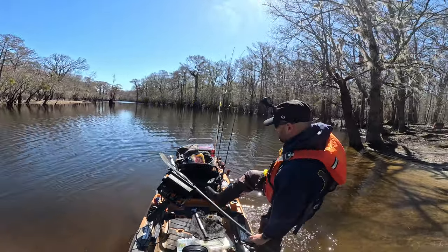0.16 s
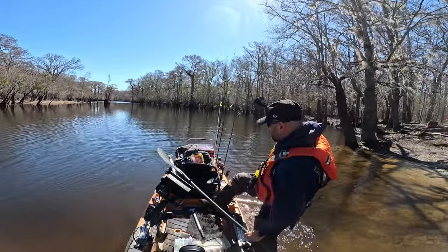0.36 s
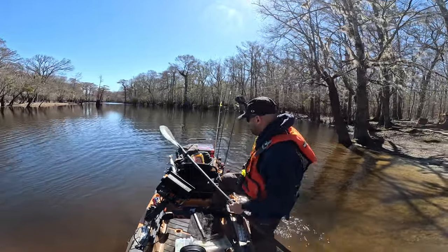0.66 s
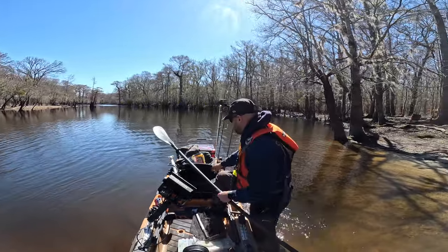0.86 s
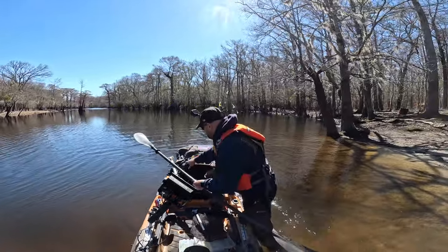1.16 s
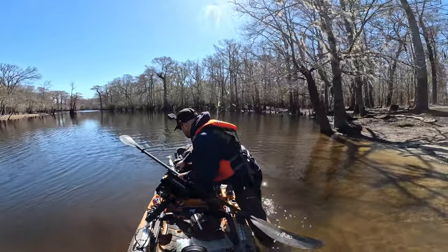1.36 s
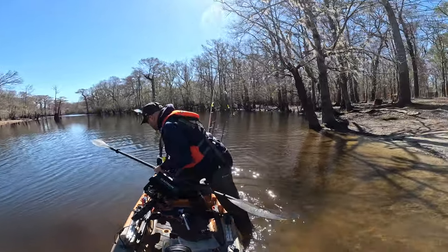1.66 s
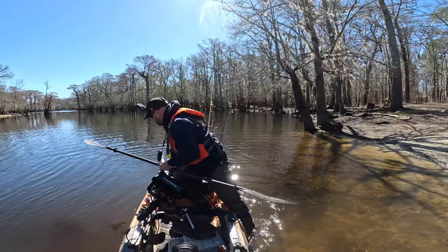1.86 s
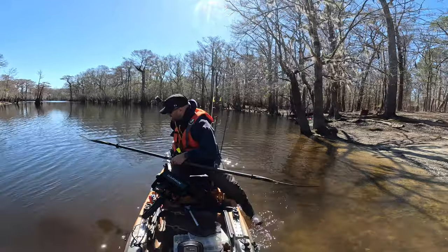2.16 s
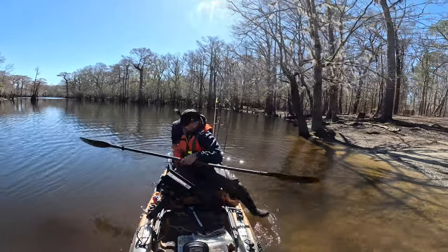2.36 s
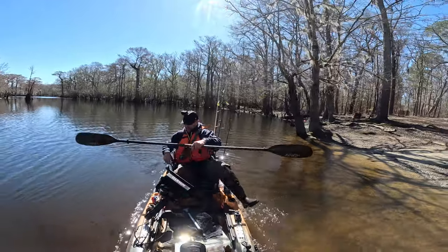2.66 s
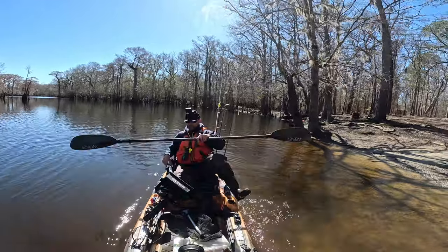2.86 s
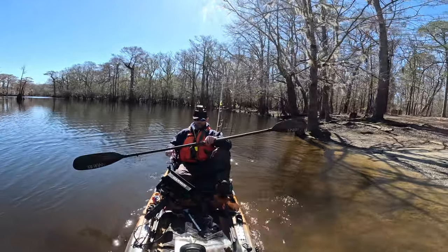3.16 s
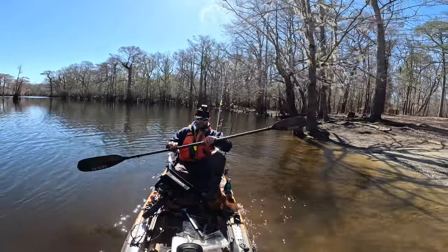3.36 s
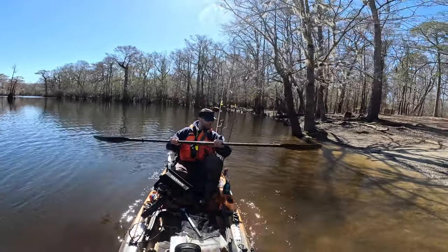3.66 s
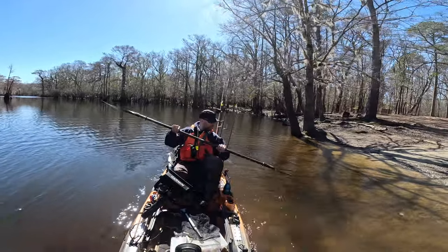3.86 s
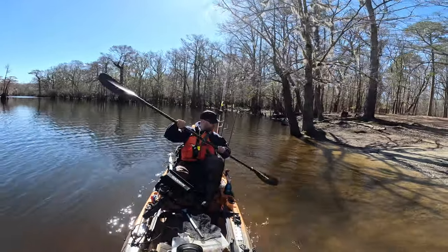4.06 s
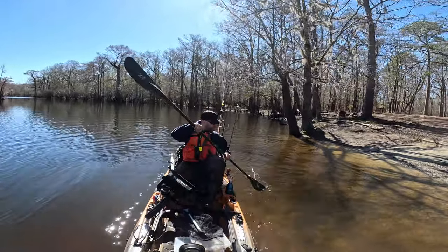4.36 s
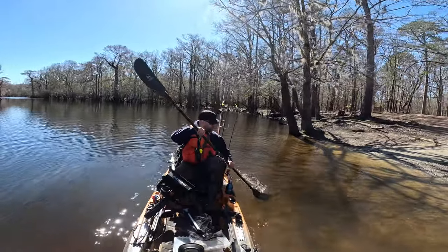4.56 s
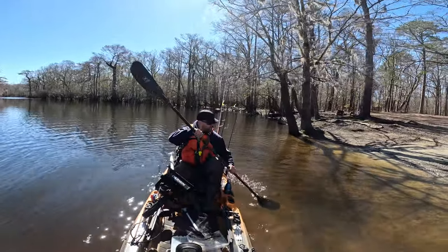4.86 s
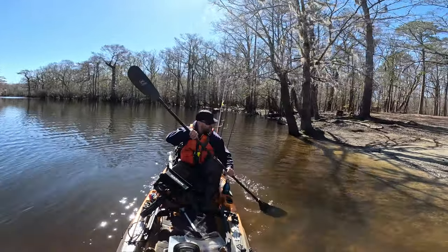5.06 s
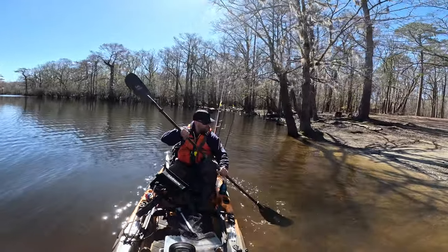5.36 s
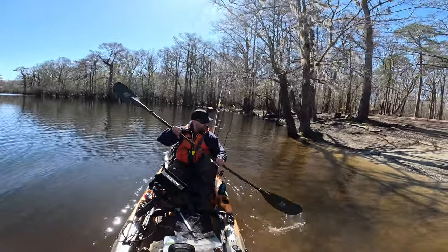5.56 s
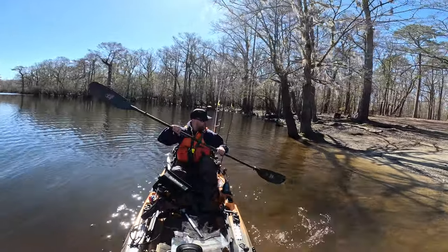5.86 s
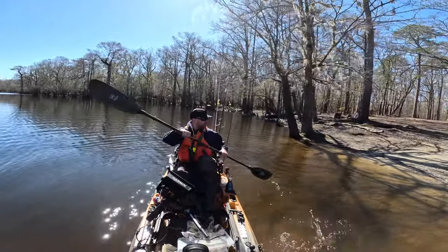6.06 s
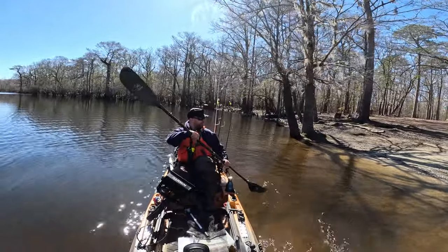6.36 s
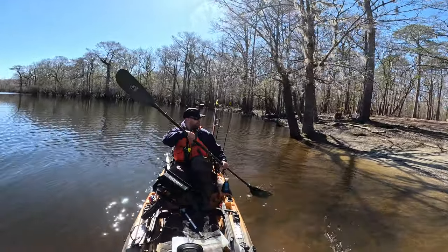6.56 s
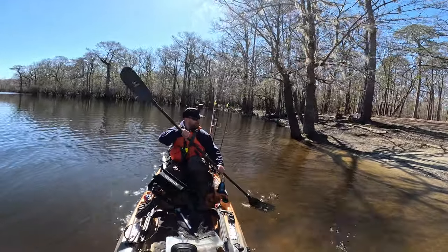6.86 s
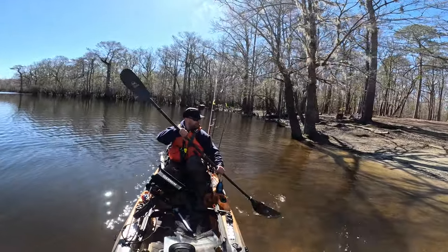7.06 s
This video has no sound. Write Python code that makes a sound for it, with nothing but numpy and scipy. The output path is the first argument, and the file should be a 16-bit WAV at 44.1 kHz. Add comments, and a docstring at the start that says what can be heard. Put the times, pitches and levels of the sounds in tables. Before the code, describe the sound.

Gritty hull scrapes and boomy knocks, wet splashing and a bubbly scramble aboard, then calm paddle strokes churn river water in a light breeze.

```python
"""A loaded plastic kayak is shoved off a sandy bank: short gritty scrapes and ticks, swinging-panel thumps,
falling slaps and a boomy rumble, all ringing through the hollow hull, heard from its deck.
Hard gear clacks as short decaying partials, and waterproof clothes swish as swells of filtered noise.
Legs and two slow paddle strokes churn water made of random clicks and swarms of ringing bubbles.
Behind them, low noise buffets the microphone in a light breeze and broader noise is the river's wash."""
import sys
import numpy as np
from scipy import signal
from scipy.fft import rfft, irfft
from scipy.io import wavfile
from scipy.ndimage import uniform_filter1d

SR = 44100
rng = np.random.default_rng(int(sys.argv[2]) if len(sys.argv) > 2 else 0)


def dump_mix(stems):
    """Bounce the given channels to the path in sys.argv[1] as a 16-bit WAV at rate SR."""
    frames = np.atleast_2d(stems).T  # one column per channel
    limited = np.clip(frames, -1, 1)  # hard clip at full scale
    pcm = np.round(limited * 32767).astype(np.int16)
    wavfile.write(sys.argv[1], SR, pcm)


N = 317520
T = np.arange(N) / SR
HZ = np.fft.rfftfreq(N, 1 / SR)

# How hard the hull slides and rocks, from the shove through boarding to the free glide.
# Each row: time in seconds, relative level in dB.
SLIDING = [(0, -41), (.3, -28), (.55, -35.5), (.85, -41), (1.6, -40), (1.9, -39), (2.03, -33), (2.6, -34.5),
           (3.0, -42.5), (3.3, -43.5), (3.9, -45), (4.25, -48.5), (5.15, -45), (5.5, -54), (5.95, -47),
           (6.4, -55.5), (7.2, -60)]
# Spectrum of swishing cloth and fine spray. Each row: frequency in Hz, relative level in dB.
SWISH_SPECTRUM = [(800, -43), (2000, -5), (3200, 5.5), (4000, 2), (6200, -4), (7400, -9.5), (8600, -26.5),
                  (11000, -10.5), (13000, -21), (15000, -44)]


def amp(db):
    """Decibels to gain."""
    return 10 ** (np.asarray(db) / 20)


def evened(x):
    """Scales to an rms of one."""
    return x / np.sqrt(np.mean(x ** 2) + 1e-20)


def peaked(x):
    """Scales so that the loudest 4 ms have an rms of one."""
    power = uniform_filter1d(x ** 2, size=176, mode="constant")
    return x / np.sqrt(power.max() + 1e-20)


def read(points, hz):
    """Reads a spectrum in dB, interpolated on a log-frequency axis."""
    f, value = np.transpose(points)
    return np.interp(np.log(hz + 1), np.log(f + 1), value)


def level(rows):
    """Gain over time from rows of (seconds, dB)."""
    return amp(np.interp(T, *np.transpose(rows)))


def swells(rows):
    """Gain over time of overlapping movements, each growing to its height and dying away."""
    swell_db = 20.5  # growth over the rise, and loss over the fall
    power = 0
    for s, rise, fall, db in rows:
        distance = np.maximum((s - T) / rise, (T - s) / fall).clip(0, 10)
        power = power + amp(db - swell_db * distance) ** 2
    return np.sqrt(power)


def add(mix, s, sound):
    """Lays a sound into the mix at s seconds."""
    part = mix[max(round(s * SR), 0):][:len(sound)]
    part += sound[:len(part)]


def play(rows, source):
    """Plays every row of an event table with one source."""
    out = np.zeros(N)
    for s, db, *rest in rows:
        add(out, s, amp(db) * source(*rest))
    return out


def noise(points):
    """Steady noise of a given spectrum."""
    return evened(irfft(rfft(rng.standard_normal(N)) * amp(read(points, HZ)), N))


def drift(rate_hz):
    """Slow random wandering: noise kept mostly below rate_hz."""
    return evened(irfft(rfft(rng.standard_normal(N)) / (1 + (HZ / rate_hz) ** 4), N))


def colour(x, points, tilt_db, size=2048):
    """A causal minimum-phase filter, so that attacks stay sharp; the tilt acts per octave above 1 kHz."""
    hz = abs(np.fft.fftfreq(size, 1 / SR))
    log_gain = np.log(amp(read(points, hz) + tilt_db * np.log2(np.maximum(hz / 1000, 1))))
    taps = np.fft.ifft(np.exp(np.conj(signal.hilbert(log_gain)))).real
    return signal.fftconvolve(x, taps[:size // 2])[:len(x)]


def scatter(t60, size=8192):
    """A short diffuse tail of unit energy, decaying 60 dB in t60 seconds."""
    t = np.arange(size) / SR
    tail = rng.standard_normal(size) * amp(-60 * t / t60) * (1 - np.exp(-t / 0.00062))
    return tail / np.linalg.norm(tail)


def clicks(per_s, spread_db, size):
    """Random clicks of either sign, a few of them large."""
    sizes = amp(spread_db * np.minimum(rng.exponential(1, size), 3))
    return (rng.random(size) < per_s / SR) * rng.choice([-1, 1], size) * sizes


def air():
    """Low buffeting at the microphone, from breeze, puffs and the rocking deck, over the river's wash."""
    # Spectra of the buffeting and of the river. Each row: frequency in Hz, relative level in dB.
    wind_spectrum = [(8, -20), (25, 0), (50, -5), (80, -5), (130, -16.5), (300, -28), (1000, -86)]
    river_spectrum = [(40, -27), (200, 1), (500, 0), (1000, -2), (2000, -8.5), (3100, -15.5), (4200, -27),
                      (6500, -34.5), (8500, -43), (12000, -49), (15000, -47)]
    # Puffs of breeze. Each row: time of the height, rise and fall in seconds, level in dB.
    puffs = [(0.65, 0.27, .25, -30.5), (2.03, 0.11, .4, -29), (2.45, 0.46, 0.27, -23.5),
             (2.69, 0.4, 0.29, -26.5), (3.84, 0.11, 0.36, -34.5), (5.2, 0.86, 0.6, -39.5),
             (5.95, 0.74, .2, -43), (7.12, 0.36, 0.13, -41.5)]
    # Wash of the open river. Each row: time in seconds, relative level in dB.
    wash = [(0, -42.5), (.9, -47.5), (1.7, -46.5), (3.1, -45), (4.2, -48.5), (5.3, -46), (7.2, -51)]
    breeze_db, gusty_db, rocking_db = -50, 5.5, -6.5  # rocking is relative to the sliding curve
    breeze = np.hypot(amp(breeze_db + gusty_db * drift(5.3)), swells(puffs))
    buffeting = np.hypot(breeze, amp(rocking_db) * level(SLIDING))
    river = noise(river_spectrum) * amp(0.5 * drift(30))
    return noise(wind_spectrum) * buffeting + amp(-3.0) * river * level(wash)


def bubble(hz, length, rise):
    """A pocket of air rings, its pitch gliding by rise octaves per length as it nears the surface."""
    u = np.arange(int(2 * length * SR) + 8) / (length * SR)
    turns = np.cumsum(hz * 2 ** (rise * u)) / SR
    envelope = (1 - np.exp(-u / 0.064)) ** 2 * np.exp(-4.5 * u)
    return peaked(np.sin(2 * np.pi * turns) * envelope)


def bubbles(low_hz, high_hz, per_s, cycles, spread_db, tilt_db, count=36):
    """A swarm of bubbles of many sizes, some louder; smaller bubbles ring higher and shorter."""
    out = np.zeros(N)
    for hz in np.geomspace(low_hz, high_hz, count):
        life, rise = rng.uniform(.5, 1.5), rng.uniform(-.1, .5)
        strengths = amp(spread_db * np.minimum(rng.exponential(1, N), 3))
        births = (rng.random(N) < per_s / count / SR) * strengths
        ring = bubble(hz, life * cycles / hz, rise)
        swarm = signal.oaconvolve(births, ring / np.linalg.norm(ring))[:N]
        out += amp(tilt_db * np.log2(hz / low_hz)) * swarm
    return evened(out)


def plop(hz, rise, splat=0.46):
    """Water closes over a large bubble with a wet splat around its pitch."""
    length = .028 * (hz / 1000) ** -0.72  # seconds; lower bubbles ring longer
    ring = bubble(hz, length, rise)
    u = np.arange(len(ring)) / (length * SR)
    spectrum = [(hz / 5, -25), (hz * 0.3, -2), (hz * 1.43, 0), (hz * 3, -16), (hz * 12, -48)]
    wet = colour(rng.standard_normal(len(ring)), spectrum, 0)
    return peaked(ring + splat * peaked(wet * np.exp(-3.5 * u)))


def water():
    """Legs and blades tear the surface and stir up gurgles, small bubbles, fine droplets and spray."""
    # A leg or blade moving through water. Each row: time of the height, rise and fall in seconds,
    # relative splash level in dB, deep gurgle over splash in dB, fine droplets over splash in dB.
    sloshes = [(0.50, .9, 0.23, -44, -9, -13), (1.56, 0.5, 0.45, -49, -16, -17.5),
               (2.16, 0.23, 0.71, -46, 5, -16), (2.40, 0.12, 0.3, -38, -3.5, -12.5),
               (2.80, 0.57, 1, -51.5, -13, -9), (4.70, 0.18, 0.29, -48.5, -4, -7),
               (4.82, 0.16, 0.34, -50, -6, -13.5), (5.40, 0.31, 0.73, -58.5, 15, -25),
               (5.62, 0.35, 0.47, -49.5, 0.5, -18), (5.79, 0.22, 0.38, -47, -7, -12.5),
               (6.20, 0.21, 0.26, -52.5, 2, -18), (6.76, 0.82, 0.47, -53, -1, -15.5),
               (7.04, 0.21, 0.21, -54, 7.5, -20), (7.17, 0.2, 0.24, -48.5, -0.5, -15)]
    # Largest single bubbles. Each row: start in seconds, relative level in dB, pitch in Hz,
    # rise in octaves over the bubble's life.
    plops = [(0.709, -35.5, 1000, -0.012), (2.071, -33, 970, -0.2), (2.146, -32, 760, -0.3),
             (2.172, -37, 588, .1), (2.352, -35, 760, 0.26), (2.303, -32.5, 1310, -0.27),
             (2.424, -34, 974, 0.27), (2.660, -33.5, 1245, 0.28), (2.678, -33, 1030, -.1),
             (2.750, -30.5, 1470, -0.34), (2.777, -32.5, 1820, -0.14), (4.673, -38, 2110, .2),
             (4.697, -45, 3800, 0.63), (4.746, -44, 1480, -.1), (4.782, -38, 1870, -.2),
             (4.808, -42, 2140, 0.39), (4.889, -43, 1800, 0.49), (5.296, -34.5, 666, 0.43),
             (5.342, -31, 713, 1), (5.350, -30, 1053, 0.57), (5.398, -41, 1060, -.1),
             (5.452, -38, 1026, .2), (5.492, -39.5, 1840, 1), (5.508, -39.5, 735, -0.38),
             (5.556, -36.5, 455, 0.15), (5.690, -36, 1380, 1), (5.720, -38.5, 342, -0.13),
             (5.784, -37.5, 446, -0.0041), (5.797, -43, 3220, .25), (5.865, -40, 900, 0.25),
             (6.739, -31, 1185, -0.29), (6.743, -36.5, 315, -0.73), (6.750, -36.5, 1780, .1),
             (6.773, -36.5, 1055, -0.73), (6.803, -41, 1240, -0.16), (6.863, -40.5, 1430, 0.7)]
    # Spectrum of torn water. Each row: frequency in Hz, relative level in dB.
    churn_spectrum = [(300, -8), (700, 5), (1400, 7), (2800, 9.5), (4000, -6), (6000, -36), (8500, -15),
                      (12000, -22), (15000, -48)]
    spray_db, drips_db = -16.5, -8.5  # gains under the splash's movement

    agitation = swells([(s, rise, fall, db) for s, rise, fall, db, _, _ in sloshes])
    undertow = swells([(s, rise, fall, db + deep_db) for s, rise, fall, db, deep_db, _ in sloshes])
    thrown = swells([(s, rise, fall, db + fine_db) for s, rise, fall, db, _, fine_db in sloshes])

    torn = colour(clicks(per_s=2600, spread_db=3, size=N), churn_spectrum, 0)
    churn = evened(torn) * amp(2.5 * drift(35))
    fizz = bubbles(1200, 3700, per_s=380, cycles=24, spread_db=4, tilt_db=-4)
    droplets = bubbles(3700, 11500, per_s=700, cycles=22, spread_db=4, tilt_db=-13)
    drips = bubbles(1100, 4200, per_s=70, cycles=30, spread_db=2, tilt_db=-4)
    splash = (.36 * churn + .9 * fizz) * agitation + droplets * thrown
    gurgle = bubbles(340, 1300, per_s=260, cycles=22, spread_db=2.2, tilt_db=-1) * undertow
    spray = noise(SWISH_SPECTRUM) * amp(1.3 * drift(25))
    fine = (amp(spray_db) * spray + amp(drips_db) * drips) * agitation
    return amp(-2.5) * splash + amp(-0.05) * gurgle + fine + amp(-2.5) * play(plops, plop)


def clothes():
    """Waterproof cloth swishes as the paddler moves: fluttering noise under slow swells."""
    # Climbing in and sitting down. Each row: time of the height, rise and fall in seconds,
    # relative level in dB.
    rustles = [(1.35, 0.71, 0.44, -58), (2.45, .6, 0.85, -49.5), (3.25, .3, 1.65, -64)]
    swish = noise(SWISH_SPECTRUM) * amp(1.8 * drift(25))
    return amp(-2.5) * swish * swells(rustles)


def clack(scale, tilt_db, bounce_s=0.001078, bounce=0.41, size=4096):
    """Hard plastic meets the shaft, chatters once and rings briefly; higher-pitched parts die sooner."""
    # Partials of the gear at scale one. Each row: pitch in Hz, relative level in dB,
    # 60 dB decay in seconds.
    partials = [(1123, 14.5, 0.065), (1338, 26, 0.029), (2440, 19.5, 0.0079), (2750, 13, 0.0075),
                (3210, 6, 0.019), (5110, 13, 0.0017), (6800, -22.5, 0.013), (7250, -41, 0.006)]
    t = np.arange(size) / SR
    ring = np.zeros(size)
    for hz, db, t60 in partials:
        brightness_db = tilt_db * np.log2(hz / partials[0][0])
        decay_db = -60 * t * scale ** 2 / t60
        ring += amp(db + brightness_db + decay_db) * np.sin(2 * np.pi * hz * scale * t)
    ring *= 1 - np.exp(-t / 0.00054)
    return peaked(ring + bounce * np.interp(t - bounce_s, t, ring, left=0))


def gear(ring_db=-14, t60=0.17):
    """Knocks of hard gear with a short scatter off the deck."""
    # Each row: start in seconds, level in dB, factor on the pitches, brightness in dB per octave.
    clacks = [(2.2282, -29.5, 1.54, 12), (2.2302, -27, 1.5, 13.5), (4.4648, -26.5, 0.986, 13.5),
              (6.7387, -38.5, 1.03, -9)]
    direct = play(clacks, clack)
    return direct + amp(ring_db) * signal.oaconvolve(direct, scatter(t60))[:N]


def scrape(length, tilt_db, lead_s, slips_per_s=3500, spread_db=3, t60=0.031,
           creep_db=-18, creep_s=0.017, size=10000):
    """A faint creep swells, a run of tiny stick-slip jerks breaks loose, and it settles."""
    # Spectrum of the grit. Each row: frequency in Hz, relative level in dB.
    grit_spectrum = [(100, -20.5), (300, 10), (600, -5), (1100, -1), (2200, 1), (3300, -1), (3900, -9),
                     (5500, -10.5), (7000, -17), (8500, -31), (11500, -33), (15000, -53)]
    t = np.arange(size) / SR - lead_s  # the jerks break loose at zero
    grit = evened(colour(clicks(slips_per_s, spread_db, size), grit_spectrum, tilt_db))
    creep = amp(creep_db) * np.exp(-abs(t) / creep_s)
    slip = np.clip(t / 0.00024, 0, 1) * amp(-60 * np.maximum(t - length, 0) / t60)
    return grit * (creep + slip)


def thump(hz, rattle=0.92, size=16384):
    """A soft blow: one hull panel swings, and the load shudders around its pitch."""
    t = np.arange(size) / SR
    spectrum = [(hz / 5, -12), (hz * 0.55, 0), (hz * 1.2, -2), (hz * 3.58, -17), (3500, -52), (10000, -85)]
    shudder = colour(rng.standard_normal(size), spectrum, 0)
    swing = np.sin(2 * np.pi * hz * t) + rattle * evened(shudder)
    decay = amp(-60 * t * hz / 21.9)  # 60 dB in 21.9 swings, so low thumps last longer
    return peaked(swing * (1 - np.exp(-t / 0.0037)) * decay)


def slap(hz, low_hz=265, glide_s=0.00677, t60=0.12, slosh=1.0, size=12000):
    """Water slaps the hull; bending waves run along it, high ones first, so the knock falls in pitch."""
    t = np.arange(size) / SR
    turns = np.cumsum(low_hz + (hz - low_hz) * np.exp(-t / glide_s)) / SR
    spectrum = [(80, 1), (250, 10.5), (580, -0.5), (850, -13.0), (1400, -13), (2500, -27), (10000, -51)]
    wet = colour(rng.standard_normal(size), spectrum, 0)
    knock = np.sin(2 * np.pi * turns) + slosh * evened(wet)
    return peaked(knock * (1 - np.exp(-t / 0.0013)) * amp(-60 * t / t60))


def hull(x, ring_db=-11, t60=0.1, size=8192):
    """The shell adds its own resonances and a short diffuse ring to whatever touches it."""
    # Hollow hull and fittings. Each row: frequency in Hz, width in Hz, relative level in dB.
    resonances = [(139, 27, -6), (373, 18, -3), (446, 18, -4), (601, 32, -8), (882, 18, 2), (1490, 45, -6),
                  (1697, 30, -4), (2113, 50, -5), (2366, 45, -2), (3133, 60, -3), (5011, 60, -2)]
    t = np.arange(size) / SR
    modes = np.zeros(size)
    for hz, width, db in resonances:
        decay = np.exp(-np.pi * width * t)
        modes += amp(db) * 2 * np.pi * width / SR * decay * np.cos(2 * np.pi * hz * t)
    response = amp(-2.0) * modes + amp(ring_db) * scatter(t60)
    return x + signal.oaconvolve(x, response)[:N]


def kayak():
    """Scrapes and ticks, thumps, slaps and the rumble of sliding reach the deck through the hull."""
    # Short scrapes and ticks: hull and load slipping, a gritty gear knock, late drips on the deck.
    # Each row: start in seconds, length in seconds, relative level in dB,
    # brightness in dB per octave above 1 kHz.
    scrapes_and_ticks = [(0.055, 0.014, -48, 8), (0.189, .014, -33.5, -2), (0.254, 0.012, -20, -2),
                         (0.292, .004, -31, -4), (0.304, 0.0072, -27.5, -6.5), (0.369, 0.0067, -26, -5),
                         (0.434, 0.0052, -22, 2.5), (0.447, 0.044, -21.5, -4), (0.5, 0.016, -27.5, -7),
                         (0.623, 0.0032, -38, -2), (1.655, 0.014, -50, 7), (1.818, 0.0037, -45, 0.5),
                         (2.001, 0.015, -28, -6.5), (2.012, 0.0025, -29, 4.5), (2.226, 0.0048, -28, 9.5),
                         (2.29, .004, -34, 1), (2.338, 0.011, -30.5, -4.5), (2.395, 0.0061, -25, -11),
                         (2.501, 0.013, -38.5, 7), (2.586, 0.0056, -38.5, 0.5), (2.654, 0.023, -35, 0.5),
                         (2.756, 0.012, -39, 1.5), (2.859, .002, -34.5, 2), (3.000, .005, -37, 1),
                         (3.163, 0.0023, -36, 0)]
    # Weight landing on the hull. Each row: start in seconds, level in dB, pitch in Hz.
    landings = [(0.020, -24.5, 89), (0.188, -22.5, 107), (0.266, -21, 301), (0.318, -24, 103),
                (0.414, -16.5, 102), (0.438, -16, 380), (0.462, -12, 182), (0.488, -17, 339),
                (0.518, -17, 184), (0.549, -24.5, 91), (2.003, -14, 157), (2.050, -21.5, 98),
                (2.195, -23.5, 216), (2.245, -22, 169), (2.336, -19, 178), (2.358, -16, 126),
                (2.396, -21.5, 403), (2.437, -27, 151), (2.512, -21.5, 214), (2.641, -25, 90),
                (2.678, -26, 179), (2.806, -27, 134.4), (2.924, -31.5, 283), (3.426, -31.5, 200),
                (3.820, -37, 77)]
    # Water slapping the hull. Each row: start in seconds, relative level in dB, first pitch in Hz.
    slaps = [(0.707, -26, 550), (1.745, -27, 570), (2.004, -37, 770), (2.071, -30.5, 708),
             (3.612, -39, 703), (5.019, -27.5, 795), (5.233, -28, 780)]
    # Spectrum of the rumble. Each row: frequency in Hz, relative level in dB.
    boom_spectrum = [(30, -14), (60, -5), (85, -3), (130, -1.5), (220, -0.5), (350, -7.5), (550, -13.5),
                     (900, -19), (1800, -34), (5000, -102)]
    lead_s = .025  # room for the creep before each start
    rows = [(s - lead_s, db, length, tilt, lead_s) for s, length, db, tilt in scrapes_and_ticks]
    scrapes = play(rows, scrape)
    thumps = play(landings, thump)
    rumble = noise(boom_spectrum) * level(SLIDING) * amp(1.7 * drift(14))
    return hull(amp(-2.5) * scrapes + thumps + amp(0.5) * play(slaps, slap) + amp(-2.0) * rumble)


def scene():
    """Sums all sounds; a diffuse side signal sets the stereo width over time."""
    # Stereo width over time. Each row: time in seconds, relative side level in dB.
    width = [(0, -0.5), (.15, -20), (.55, -70), (5.5, -72), (5.7, -34), (6.25, -11), (7.2, -8.5)]
    # Spectrum of the diffuse side signal. Each row: frequency in Hz, relative side level in dB.
    side_spectrum = [(30, 3), (150, -9), (500, -10.5), (1500, -2), (3200, -4), (4500, -11), (8000, -11),
                     (14000, -16)]
    # Lasting difference between two microphone ports. Each row: frequency in Hz, side-to-mid in dB.
    ports = [(30, -110), (5000, -42), (8500, -21), (10500, -24), (12000, -3), (15000, 6)]
    mid = kayak() + gear() + water() + clothes() + air()
    diffuse = rfft(signal.oaconvolve(mid, scatter(t60=0.033))[:N])
    varying = irfft(diffuse * amp(read(side_spectrum, HZ)), N) * level(width)
    side = varying + irfft(diffuse * amp(read(ports, HZ)), N)
    return np.array([mid + side, mid - side])


def record(dry):
    """A low-pass filter limits the band to about 14.6 kHz."""
    taps = signal.firwin(255, 14600, window=("kaiser", 9), fs=SR)
    return signal.oaconvolve(dry, taps[None], "same")


dry = scene()
out = record(dry)
dump_mix(out)
```